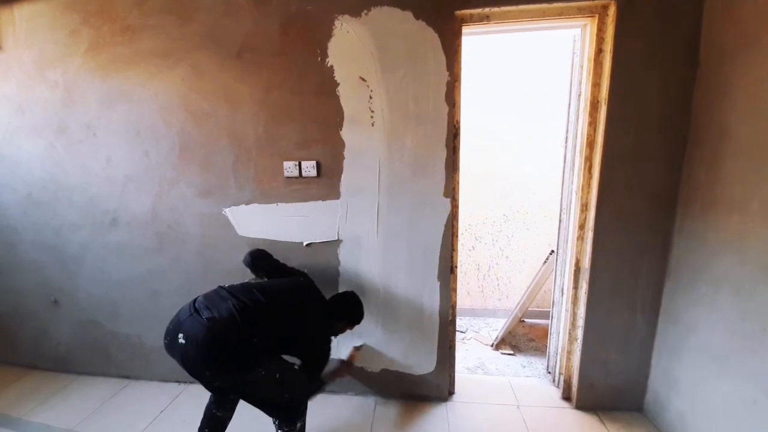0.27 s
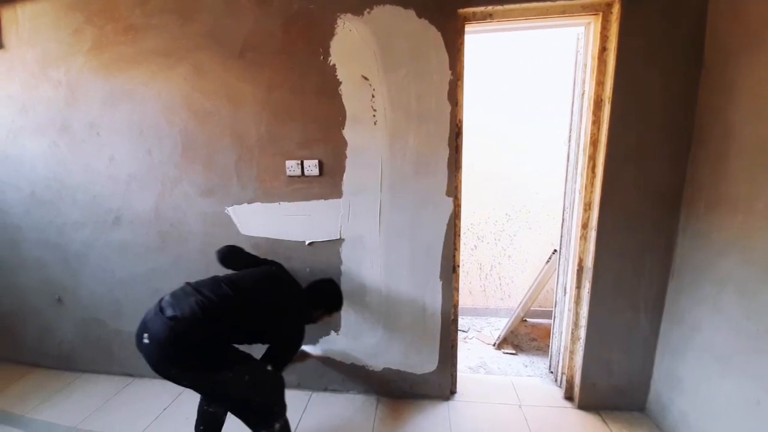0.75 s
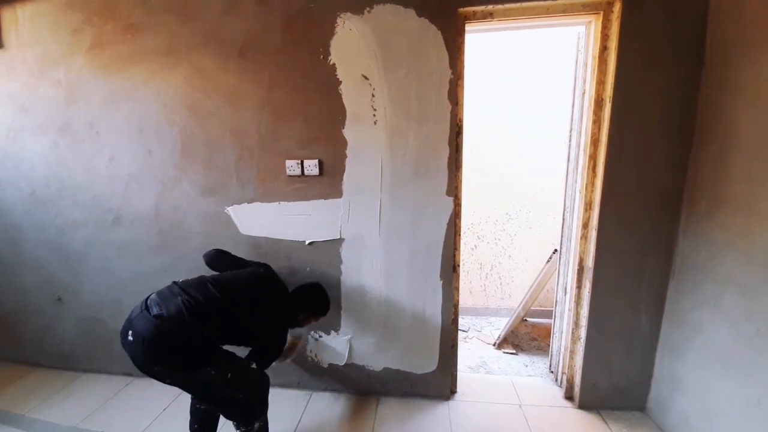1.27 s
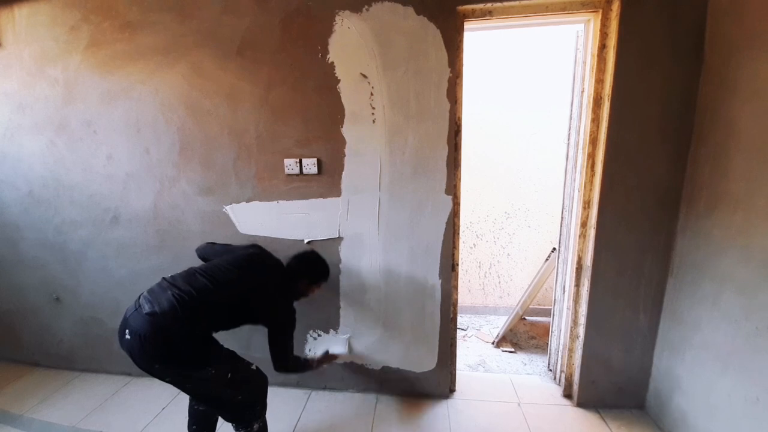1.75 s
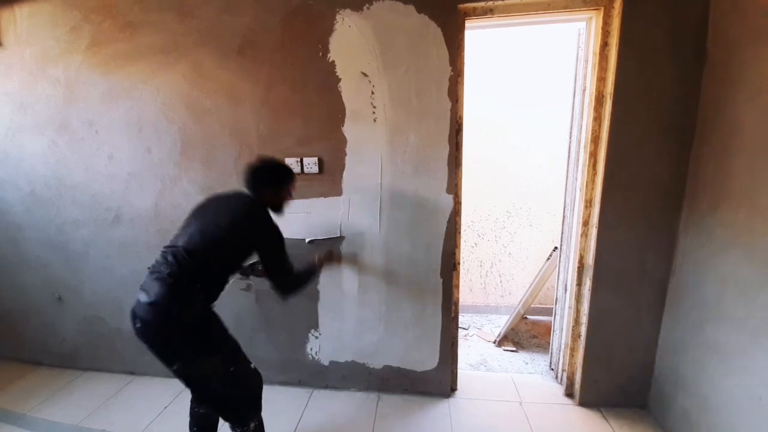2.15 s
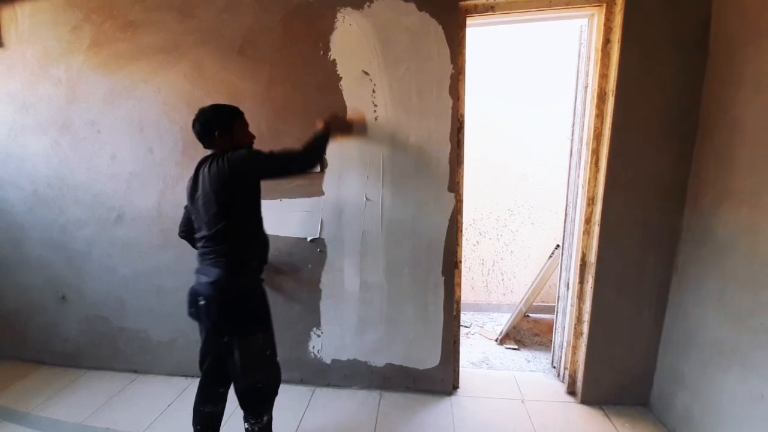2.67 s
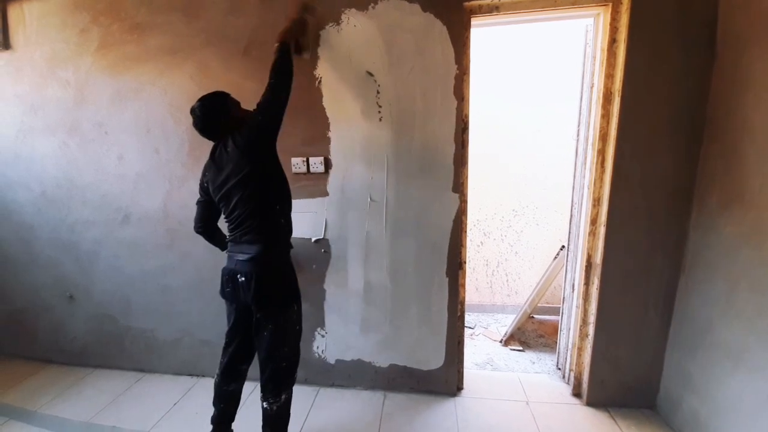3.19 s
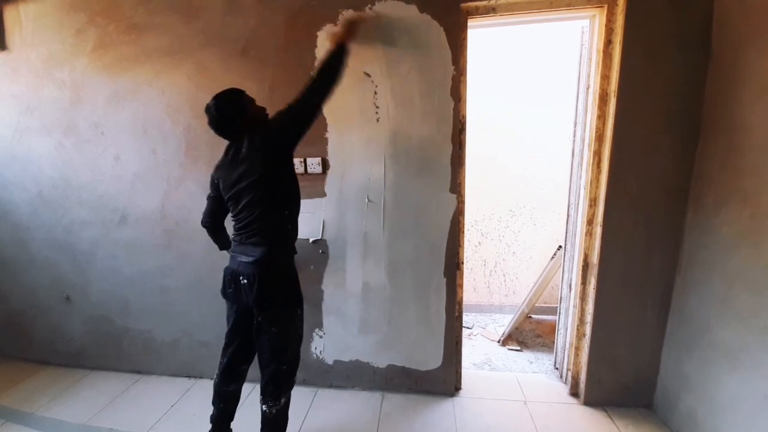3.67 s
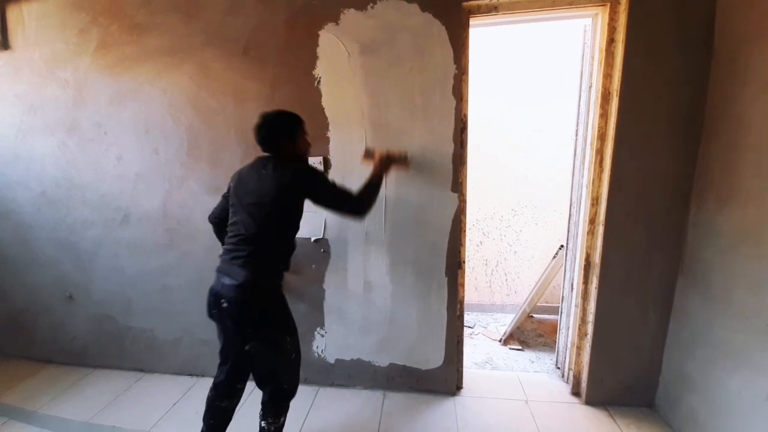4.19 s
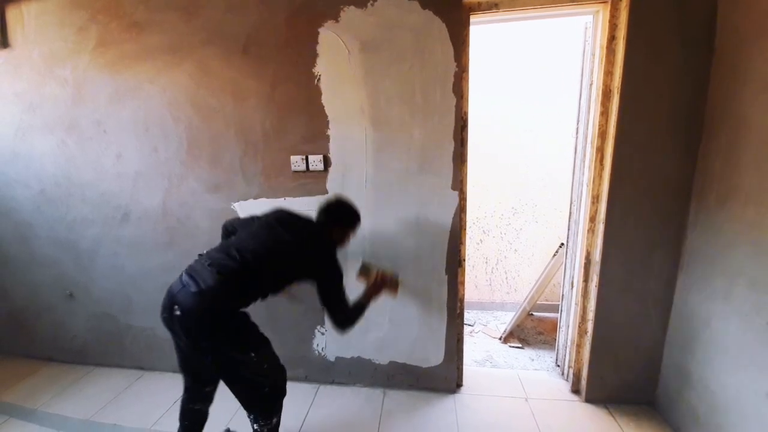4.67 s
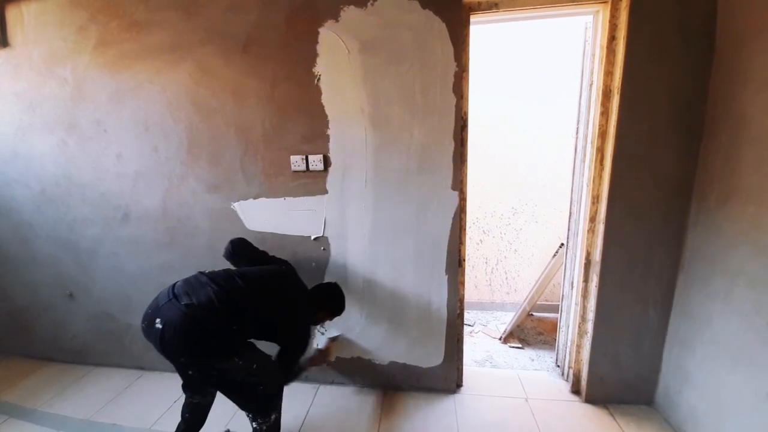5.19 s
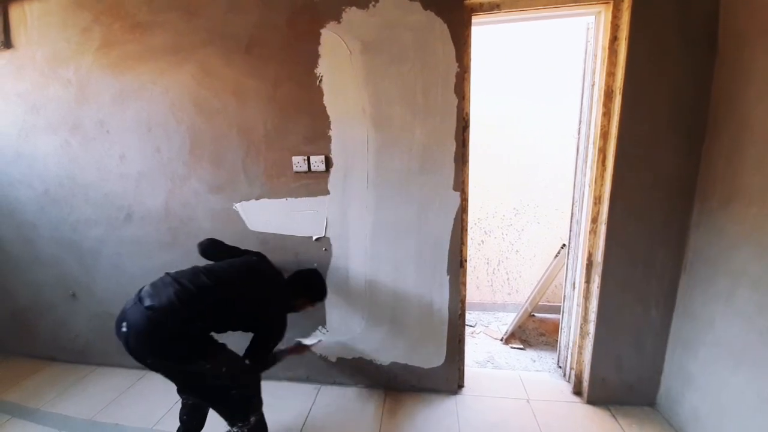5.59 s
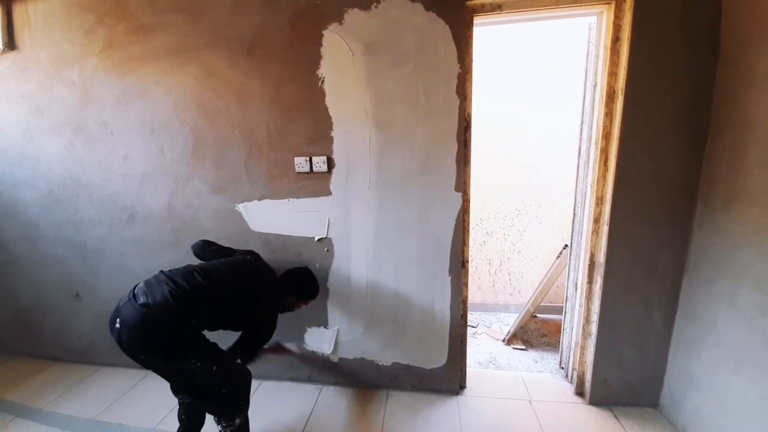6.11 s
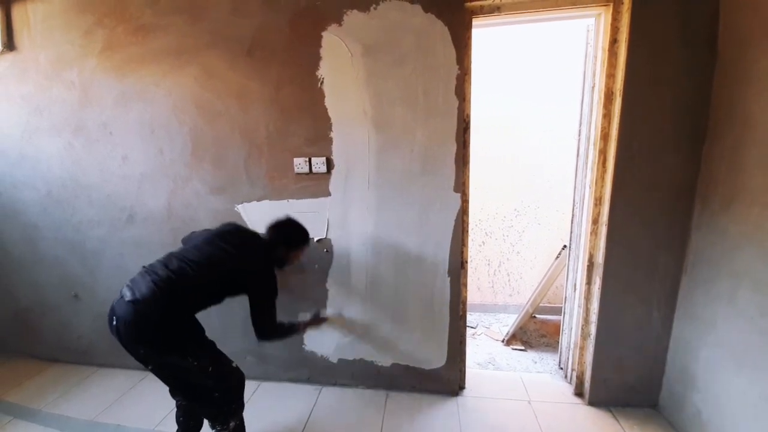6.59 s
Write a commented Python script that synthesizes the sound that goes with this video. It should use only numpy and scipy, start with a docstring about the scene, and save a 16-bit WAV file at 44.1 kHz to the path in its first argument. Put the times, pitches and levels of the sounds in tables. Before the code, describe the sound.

Gritty, rasping pulls and short jabs of a putty blade on cement echo around an empty room, the blade clacking as it lands.

```python
"""You hear a gritty scrape: a steel blade spreads putty over a rough cement wall in a bare, echoing room.
Long pulls alternate with short jabs that reload the blade. Sand grains catch its edge and make it rasp,
and it judders (sticks and slips) when pressed flat. Now and then it knocks and rings as it lands.
A faint hum and a soft rumble come in through the open door."""
import sys
import numpy as np
from scipy import signal
from scipy.fft import rfft, irfft, next_fast_len
from scipy.io import wavfile

SR = 44100
rng = np.random.default_rng(int(sys.argv[2]) if len(sys.argv) > 2 else 0)


def pcm_store(signal):
    """Save signal as 16-bit PCM."""
    levels = np.round(np.clip(np.atleast_2d(signal), -1, 1) * 32767)
    wavfile.write(sys.argv[1], SR, levels.astype(np.int16).T)


N = 302085
TIME = np.arange(N) / SR

# Levels in the tables are relative: the functions set the final mix.
# Pulls along the wall, heavy or light. The swell builds over the hold; judder and grit add to scrape_db.
# start_s, attack_s, hold_s, scrape_db, swell_db, judder_db, grit_db
PULL_STROKES = [(-.1, 0.1, 0.65, -18, -7, -1.9, -9.5), (.755, .15, 0.1, -37.5, -2.5, 0, -1.5),
                (1.672, 0.28, 0.28, -16, -3.5, -4.5, -8), (2.299, 0.052, 0.28, -33.5, 2, 1.5, -11),
                (2.988, 0.069, 0.09, -39.5, 10.5, -2, -10), (3.29, 0.077, 0.085, -30.5, 5, 0, -3),
                (3.597, .29, 1.541, -16.5, -4, -2.8, -7.5), (5.54, .21, 0.11, -38, -2.5, 0, -2),
                (6.469, 0.21, .25, -16.5, -6, -5.5, -7.5)]
# Short jabs that reload the blade, bite into the putty or finish a pull. Tilt: 0 is flat, 1 is on edge.
# start_s, attack_s, hold_s, scrape_db, judder_db, grit_db, tilt, bend_hz
JAB_STROKES = [(0.566, 0.046, 0.031, -30.5, 12, -22, .05, 1850),
               (1.087, 0.17, 0.017, -19, -18, -9.5, 0.53, 1630),
               (1.595, 0.088, 0.033, -13, -5, -11, 0.094, 1080),
               (2.102, 0.1, 0.038, -16, -17.5, -5.5, 0.25, 1480),
               (2.74, 0.027, 0.03, -33.5, -18, -9, 0.96, 1700),
               (3.125, .1, 0.048, -18, -17, -4.5, 0.91, 1060),
               (3.421, .14, 0.098, -13.5, -8, -5.5, 0.66, 1120),
               (5.868, 0.093, 0.052, -20, -19, -3, .5, 1420),
               (6.326, 0.082, .032, -18.5, -10, -11.5, 0.34, 2020)]
# How high the blade is on the wall: time_s, height_m
BLADE_HEIGHT = [(0, 0.66), (.4, 0.11), (1.7, 0.23), (3.0, 2.12), (3.45, 2.17), (3.9, 1.68), (5.2, 0.083),
                (6.5, 0.22), (6.85, 2.2)]
# The tone of a stroke's middle scrape, low judder and bright grit: pitch_hz, level_db
SCRAPE_TONE = [(30, -50), (200, -39), (480, -23), (700, -10), (950, -1.5), (1250, -1.5), (1550, 1.5),
               (2100, 0.7), (2700, -5), (3500, -10), (5000, -16.5), (9000, -21)]
JUDDER_TONE = [(30, -36), (100, -10.5), (190, -25), (290, -10.5), (380, -12), (520, -2.5), (690, 3),
               (850, -3), (1100, -8.5), (2200, -19)]
GRIT_TONE = [(30, -60), (500, -50), (1500, -1), (2800, 1.5), (4000, -0.5), (5500, -0.5), (7500, -1.5),
             (11500, -2), (15500, -4)]
# How long the room's echo takes to fade by 60 dB: pitch_hz, fade_s
ECHO_FADE = [(150, 1), (500, 1), (1400, 0.74), (3700, 0.71), (8000, 0.4), (15000, 0.19)]
# How alike left and right sound (0 is unrelated; capped just below 1 when used): pitch_hz, likeness
STEREO_LIKENESS = [(100, 1.6), (250, 0.75), (500, 0.89), (1000, 0), (2000, 0.03), (4000, -0.1452),
                   (12000, -0.17)]
# The tone of the outdoor rumble: pitch_hz, level_db
RUMBLE_TONE = [(20, -1), (40, -7), (60, 11.5), (90, 2), (125, 17.5), (180, 10.5), (300, 22), (600, 12),
               (2000, -27), (8000, -37)]
# The rise and fall of the far-off hum: time_s, level_db
HUM_LEVELS = [(0, -68), (.85, -52), (1.25, -72), (1.9, -52.5), (2.6, -53), (3.6, -56), (5.0, -62),
              (6.4, -68), (6.85, -55.5)]
# Each landing of the blade: start_s, thud_db, clack_db, tick_db
LANDINGS = [(1.001, -28.5, -27.5, -34), (1.546, -50, -38, -33.5), (1.590, -35.5, -22, -23),
            (1.858, -33.5, -19.5, -45), (2.242, -56, -35, -26), (2.778, -53, -39, -34),
            (3.234, -61, -37, -21), (3.528, -47, -24, -36), (5.588, -46, -31.5, -70),
            (6.319, -48, -45, -35.5), (6.351, -38, -28.5, -34), (6.645, -34, -18, -30)]
# The loaded blade's low and high ringing notes: pitch_hz, level_db, fade_s (time to drop 60 dB)
THUD_NOTES = [(204, -8, 0.021), (258, -5.5, 0.038), (288, -9, 0.077), (384.3, -4, 0.1)]
CLACK_NOTES = [(470, 3, 0.069), (625, 11, 0.056), (753, 13, 0.025), (1014, 17.5, 0.012), (1200, 8, 0.041),
               (1486, 13.5, 0.015), (1670, 3, 0.045), (1960, 16.5, 0.0047)]
# How much louder the left microphone is than the right: pitch_hz, left_minus_right_db
MIC_BALANCE = [(100, 6.7), (300, 1.5), (1000, 2.6), (2000, 1.1), (12000, .9)]
# How strongly both microphones pick up each pitch: pitch_hz, level_db
MIC_TONE = [(100, 4), (6000, -2.5), (7500, -4), (8000, -10.5), (8500, -17), (9500, -14.5), (11500, -11.5),
            (13500, -13), (16000, -15.5)]


def from_db(db):
    """Turn decibels into a number to multiply a sound by."""
    return 10 ** (np.asarray(db) / 20)


def unit_power(x):
    """Scale a sound so that its average power is 1."""
    return x / np.sqrt(np.mean(x ** 2) + 1e-20)


def over_time(rows):
    """Join a table's (time_s, value) points with straight lines, one value per sample."""
    return np.interp(TIME, *np.transpose(rows))


def at_pitch(rows, hz):
    """Read between a table's (pitch_hz, value) points, spacing the octaves evenly."""
    pitches, values = np.transpose(rows)
    return np.interp(np.log(hz + 1), np.log(pitches), values)


def colour(x, tone):
    """Turn each pitch of a sound up or down as a tone table says."""
    size = next_fast_len(N + 4096)
    gain = from_db(at_pitch(tone, np.fft.rfftfreq(size, 1 / SR)))
    return irfft(rfft(x, size) * gain, size)[..., :N]


def drift(rate_hz):
    """A smooth random wobble, about 1 in size, that changes about rate_hz times a second."""
    memory = np.exp(-40 * np.pi * rate_hz / SR)
    noise = rng.standard_normal(N // 20 + 2002)  # one value per 20 samples, plus a run-up
    slow = signal.lfilter([1], [1, -2 * memory, memory * memory], noise)[2000:]
    return np.interp(np.arange(N) / 20, np.arange(len(slow)), unit_power(slow))


def press(start_s, attack_s, hold_s, curve, lift_db_per_s):
    """The strength of one stroke: the hand leans in, holds and lifts off."""
    rise = np.clip((TIME - start_s) / attack_s, 0, 1) ** curve
    lifted_s = np.clip(TIME - start_s - attack_s - hold_s, 0, 1)
    return rise * from_db(-lift_db_per_s * lifted_s)


def hand(reach_m=2.29, tilt_per_m=0.098, judder_db_per_m=-5):
    """The hand sets the blade's loudness, tilt and bending pitch; the hardest stroke counts most."""
    height = over_time(BLADE_HEIGHT)
    # Higher pulls are steeper and judder less; near full reach the blade tips onto its edge.
    pull_tilt = np.clip(tilt_per_m * height + (height / reach_m) ** 13, 0, 1)
    pull_hz = np.interp(pull_tilt, [0, 1], [1900, 710])
    moves = []
    for start_s, attack_s, hold_s, db, swell_db, judder_db, grit_db in PULL_STROKES:
        progress = np.clip((TIME - start_s - attack_s) / hold_s, 0, 1)
        pressure = press(start_s, attack_s, hold_s, curve=1.1, lift_db_per_s=197)
        gain = from_db(db + swell_db * progress ** 2) * pressure
        judder = from_db(judder_db + judder_db_per_m * height)
        moves.append((gain ** 2, judder, from_db(grit_db), pull_tilt, pull_hz))
    for start_s, attack_s, hold_s, db, judder_db, grit_db, tilt, bend_hz in JAB_STROKES:
        gain = from_db(db) * press(start_s, attack_s, hold_s, curve=1.79, lift_db_per_s=220)
        moves.append((gain ** 2, from_db(judder_db), from_db(grit_db), tilt, bend_hz))
    powers, *columns = zip(*moves)
    total = sum(powers)
    judder, grit, tilt, bend_hz = [
        sum(power * value for power, value in zip(powers, column)) / total for column in columns]
    scrape = np.sqrt(total)
    return scrape, scrape * judder, scrape * grit, np.clip(tilt, 0, 1), bend_hz


def catches(tone, per_s, spread_db):
    """The edge catches on the sandy wall in random clicks: many small, a few large."""
    sizes = from_db(spread_db * np.minimum(rng.exponential(1, N), 5))
    signs = rng.choice([-1, 1], N)
    hits = rng.random(N) < per_s / SR
    return unit_power(colour(sizes * signs * hits, tone))


def blade_resonance(x, shape, pitch_hz, width, block=256):
    """The blade favours a gliding band of pitches; width is a share of the band's centre pitch."""
    state, out = np.zeros(2), np.zeros(N)
    for i in range(0, N, block):
        angle = 2 * np.pi * pitch_hz[i] / SR
        memory = np.exp(-width * angle / 2)
        feedback = [1, -2 * memory * np.cos(angle), memory * memory]
        out[i:i + block], state = signal.lfilter(shape, feedback, x[i:i + block], zi=state)
    return out


def strokes():
    """Sand grains strike the blade and make it rasp and bend; the bumpy wall shakes the pressure."""
    scrape_gain, judder_gain, grit_gain, tilt, bend_hz = hand()
    bend_hz = bend_hz * np.exp(0.063 * drift(1.8))  # the pitch wanders with the grip
    # From flat to on edge, the bending rings louder and the blade's lowest note rises.
    bend_gain = from_db(np.interp(tilt ** 2, [0, 1], [-8.5, 3.5]))
    lowest_hz = np.interp(tilt, [0, 1], [236, 730])
    keep_band, cut_bass = [1, 0, -1], [1, -2, 1]  # filter shapes
    rasp = catches(SCRAPE_TONE, per_s=7000, spread_db=3.0)
    kicks = catches(SCRAPE_TONE, per_s=2500, spread_db=4.5)
    bend = unit_power(blade_resonance(kicks, keep_band, bend_hz, width=0.2))
    scrape = (rasp + bend_gain * bend) / np.hypot(1, bend_gain)  # the two share the rubbing power
    # The whole blade sticks and slips more slowly than single grains pass.
    judder = catches(JUDDER_TONE, per_s=700, spread_db=4.0)
    grit = catches(GRIT_TONE, per_s=12000, spread_db=2.5)
    bumps = from_db(1.64 * drift(26.3))
    rubbing = (from_db(-2.63) * scrape_gain * scrape
               + from_db(-4.5) * judder_gain * judder
               + from_db(4.0) * grit_gain * grit)
    # The blade gives off little sound below its lowest note.
    return blade_resonance(bumps * rubbing, cut_bass, lowest_hz, width=0.7)


def surrounding_noise(size):
    """The pitches and spectrum of noise from all sides: left and right are alike only in the bass."""
    hz = np.fft.rfftfreq(size, 1 / SR)
    shared, opposite = rfft(rng.standard_normal((2, size)))
    alike = np.clip(at_pitch(STEREO_LIKENESS, hz), -0.99, 0.99)
    return hz, np.sqrt(1 + alike) * shared + np.sqrt(1 - alike) * opposite * [[1], [-1]]


def echo_pattern(build_s=0.0016):
    """The room's dense echo of a click at one spot on the wall; the high pitches die first."""
    t = np.arange(SR) / SR
    hz, noise = surrounding_noise(SR)
    centres_hz = np.geomspace(125, 16000, 8)
    pattern = 0
    for centre_hz, share in zip(centres_hz, np.eye(len(centres_hz))):
        band = irfft(noise * np.interp(np.log(hz + 1), np.log(centres_hz), share), SR)
        fade = from_db(-60 * t / at_pitch(ECHO_FADE, centre_hz)) * (1 - np.exp(-t / build_s))
        pattern = pattern + band * fade / np.linalg.norm(fade)
    return pattern


def room(x, direct_db, echo_db, spots, step_s=0.014):
    """Bare walls echo louder than the direct sound; a moving blade fades from spot to spot."""
    lead = SR // 2  # work is already under way, so the room rings from the start
    running = np.pad(x, (lead, 0), mode="reflect")
    position = np.arange(len(running)) / (step_s * SR)
    size = next_fast_len(len(running) + SR)
    echo = 0
    for spot in range(spots):
        nearness = np.sin(np.pi / 2 * np.minimum((position - spot) % spots, 2)) if spots > 1 else 1
        echo = echo + rfft(running * nearness, size) * rfft(echo_pattern(), size)
    return from_db(direct_db) * x + from_db(echo_db) * irfft(echo, size)[:, lead:lead + N]


def outdoors(hum_hz=109, waver_hz=2.52, rumble_db=-54):
    """A wavering far-off hum and a soft rumble come through the door."""
    phase = 2 * np.pi * np.cumsum(hum_hz + waver_hz * drift(4.06)) / SR
    hum_db = over_time(HUM_LEVELS) - 7.0 + 1.4 * drift(18)
    hum = np.sqrt(2) * np.sin(phase) * from_db(hum_db)
    size = next_fast_len(N)
    _, spectrum = surrounding_noise(size)
    air = irfft(spectrum, size)[:, :N]
    return hum + from_db(rumble_db) * unit_power(colour(air, RUMBLE_TONE))


def ringing(notes, t):
    """One blow sets the blade's notes ringing and fading, each with a slightly random strength."""
    wave = 0
    for k, (hz, db, fade_s) in enumerate(notes):
        fade = from_db(db + rng.normal(0, 1) - 60 * t / fade_s)
        wave = wave + (-1) ** k * fade * np.sin(2 * np.pi * hz * t)
    return wave / np.std(wave[:SR // 50])  # power 1 over the first 20 ms


def knocks(tick_fade_s=0.019, lowest_hz=170):
    """The landing blade rings with a hollow thud and a clack; its edge crushes sand with a tick."""
    out = np.zeros(N + SR)
    t = np.arange(SR // 2) / SR
    for start_s, thud_db, clack_db, tick_db in LANDINGS:
        tick = 3 * rng.standard_normal(len(t)) * from_db(tick_db - 60 * t / tick_fade_s)
        thud = from_db(thud_db) * ringing(THUD_NOTES, t)
        clack = from_db(clack_db) * ringing(CLACK_NOTES, t)
        start = round(start_s * SR)
        out[start:start + len(t)] += thud + clack + tick
    # The knocks carry no deep bass.
    cut_bass = signal.butter(3, lowest_hz, "high", fs=SR, output="sos")
    return signal.sosfilt(cut_bass, out[:N] + 1e-18)


def scene():
    """Travelling strokes and knocks on one spot fill the room, with the outdoors behind them."""
    scraping = room(strokes(), direct_db=-7.5, echo_db=-2.22, spots=18)
    knocking = room(knocks(), direct_db=-8, echo_db=-3.5, spots=1)
    return scraping + knocking + outdoors()


def record(dry, cutoff_hz=15900):
    """The left microphone is a little louder; both dull the highest pitches, then cut off steeply."""
    left = colour(dry[0], [(hz, db / 2) for hz, db in MIC_BALANCE])
    right = colour(dry[1], [(hz, -db / 2) for hz, db in MIC_BALANCE])
    cut_treble = signal.ellip(12, 0.1, 80, cutoff_hz, fs=SR, output="sos")
    return signal.sosfilt(cut_treble, colour(np.array([left, right]), MIC_TONE))


dry = scene()
out = record(dry)
pcm_store(out)
```